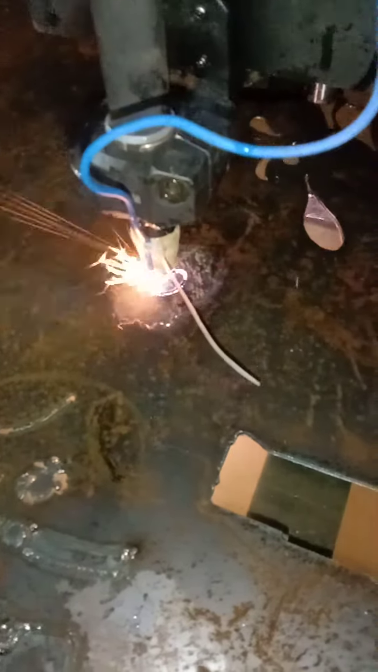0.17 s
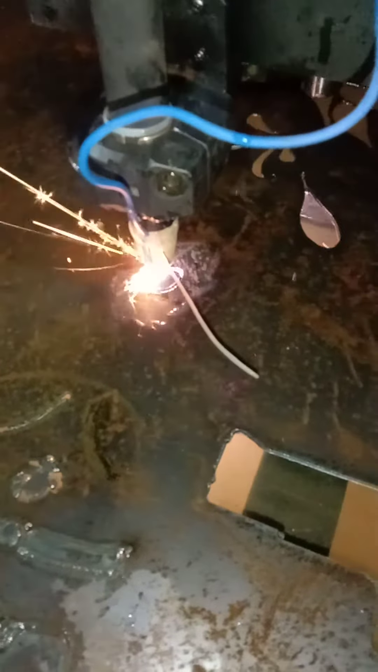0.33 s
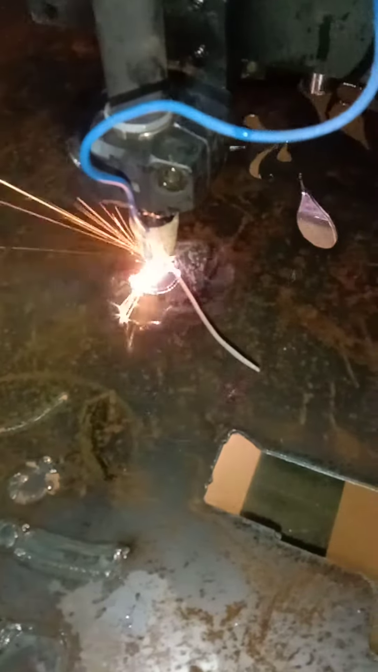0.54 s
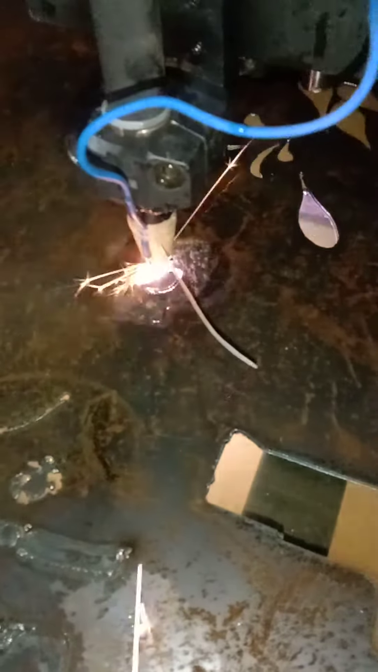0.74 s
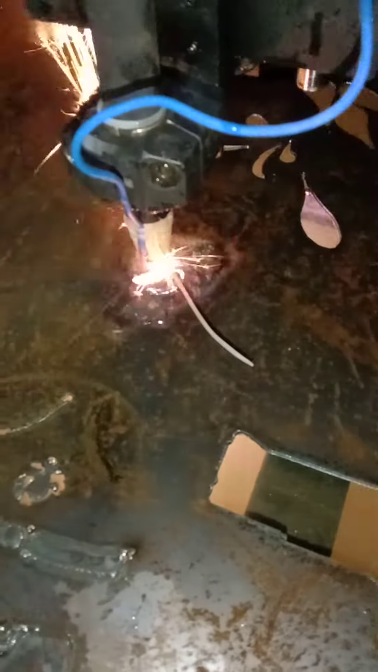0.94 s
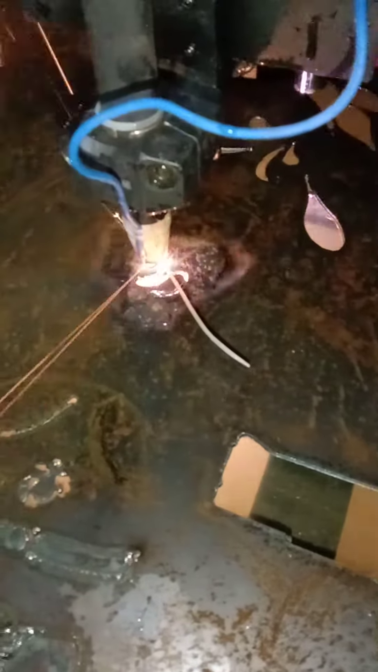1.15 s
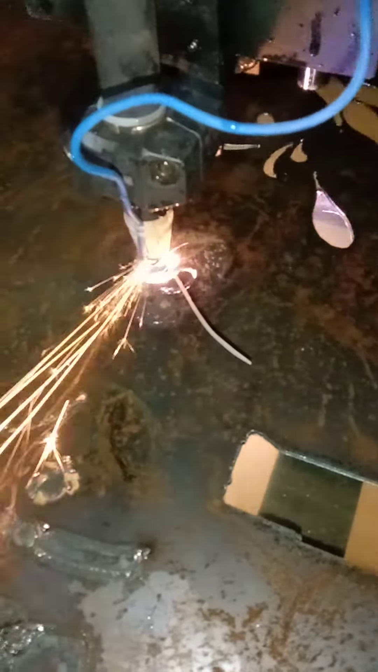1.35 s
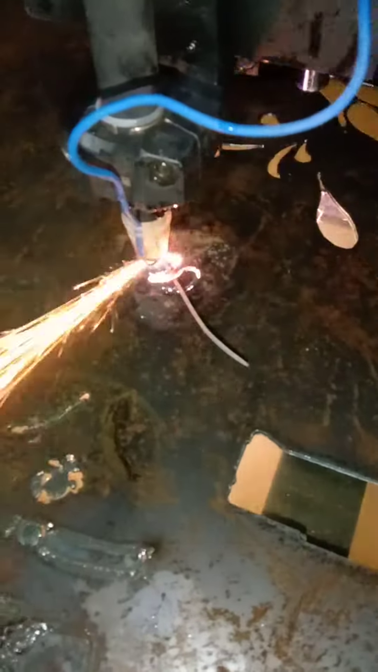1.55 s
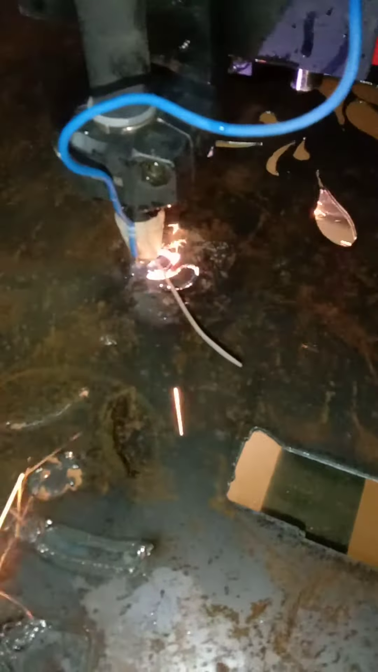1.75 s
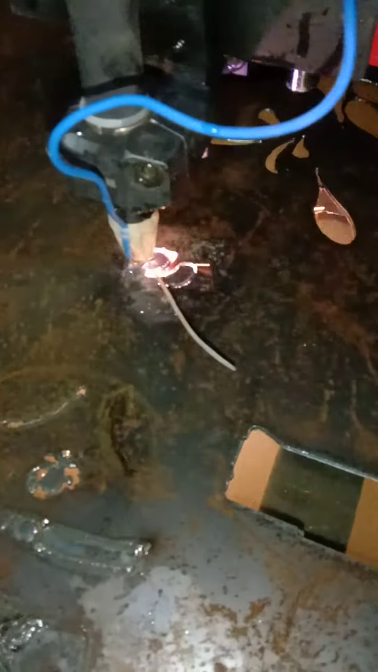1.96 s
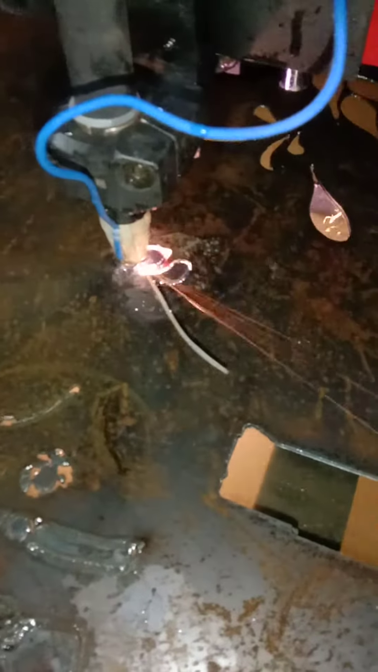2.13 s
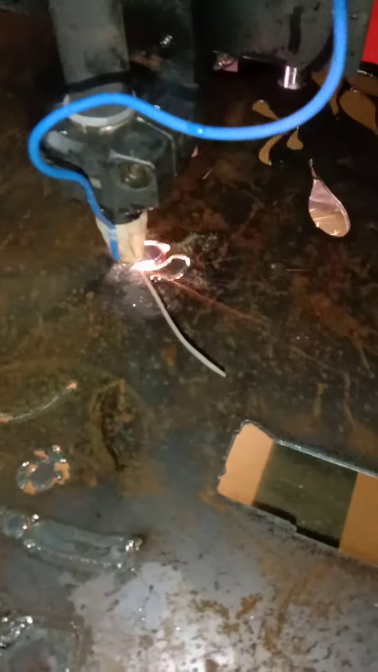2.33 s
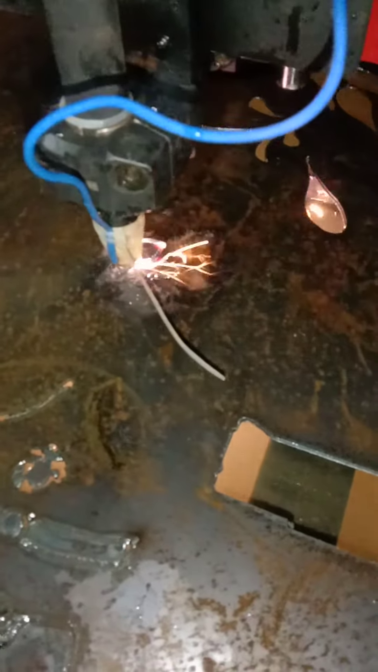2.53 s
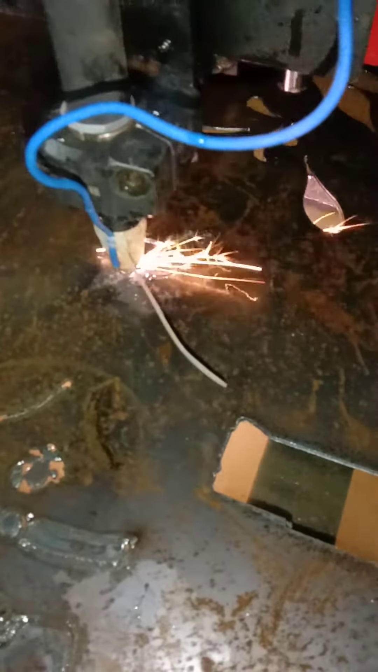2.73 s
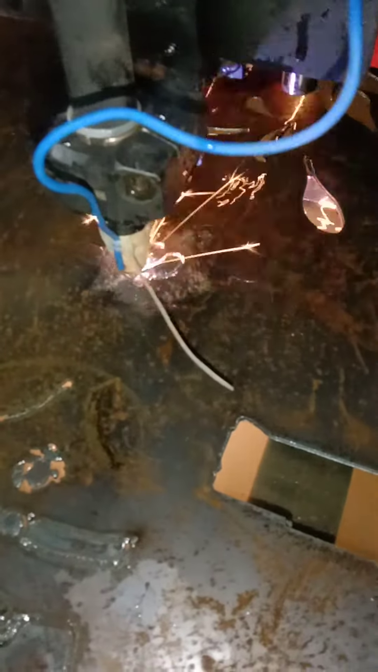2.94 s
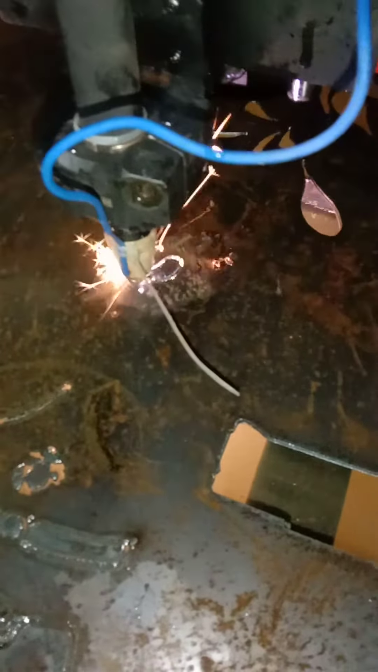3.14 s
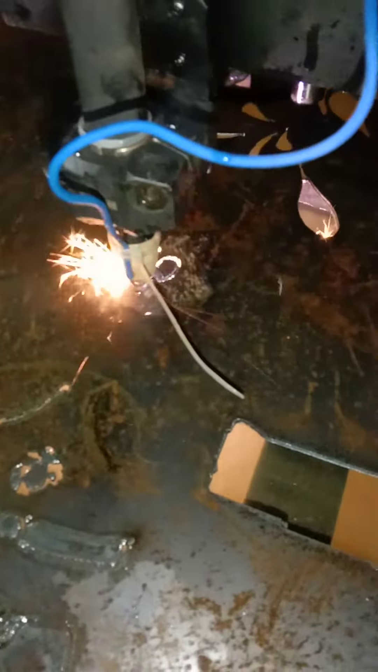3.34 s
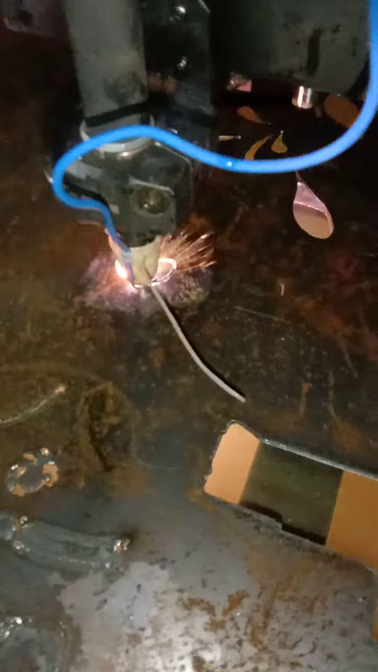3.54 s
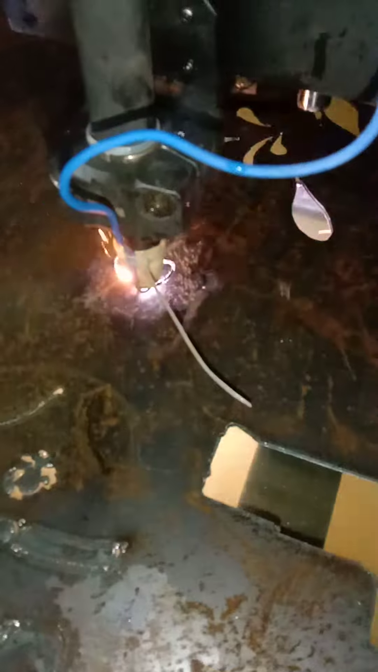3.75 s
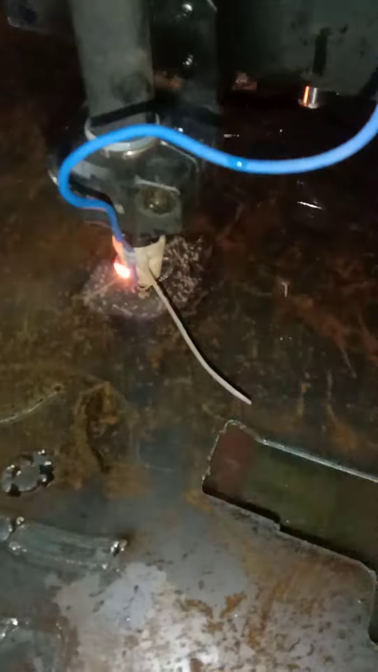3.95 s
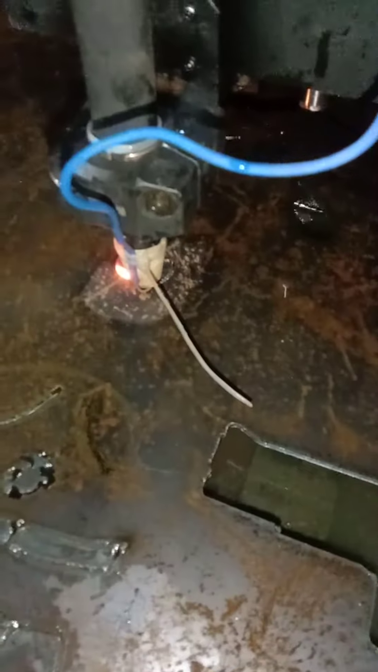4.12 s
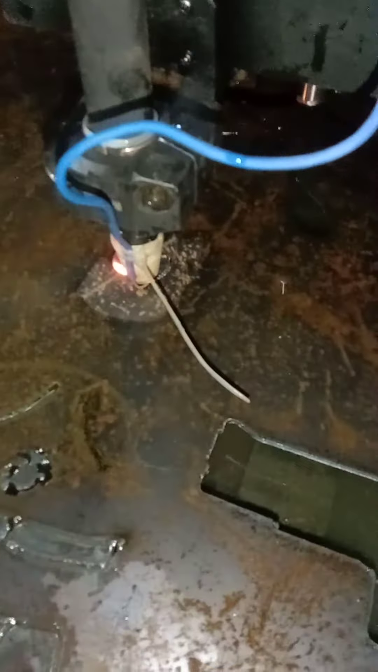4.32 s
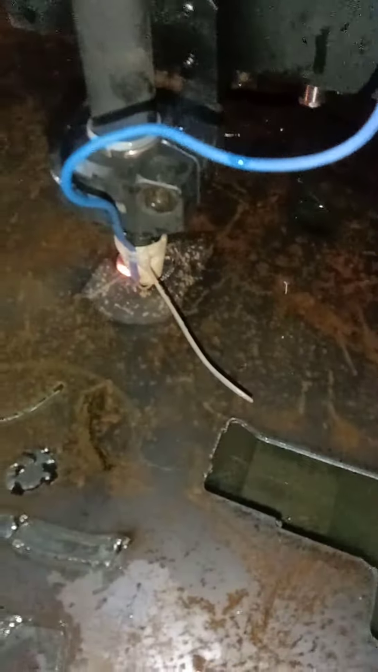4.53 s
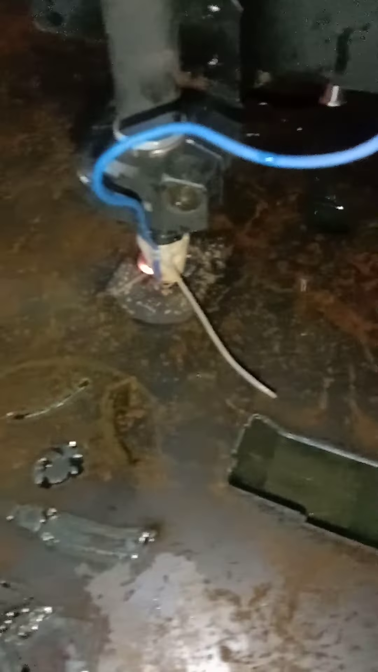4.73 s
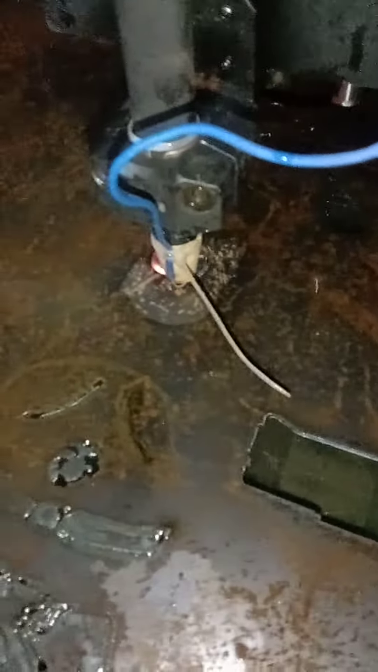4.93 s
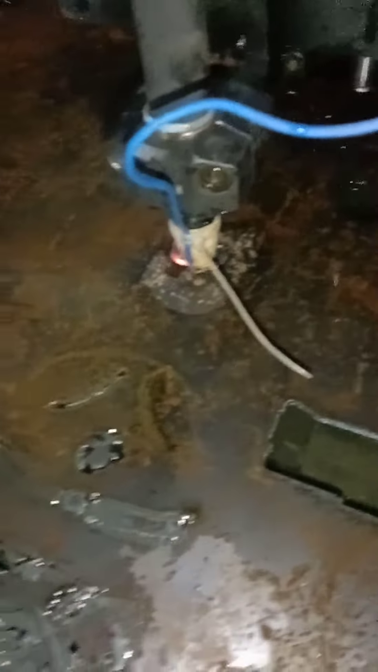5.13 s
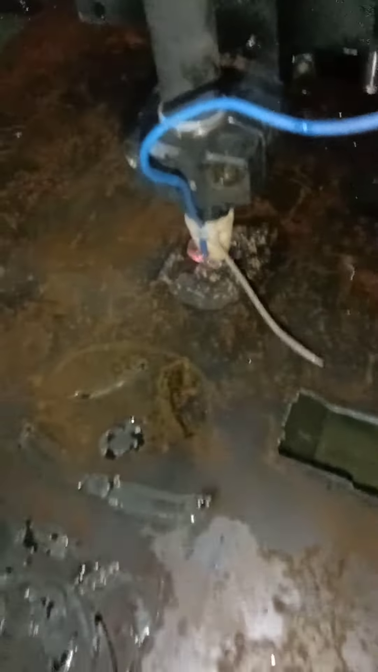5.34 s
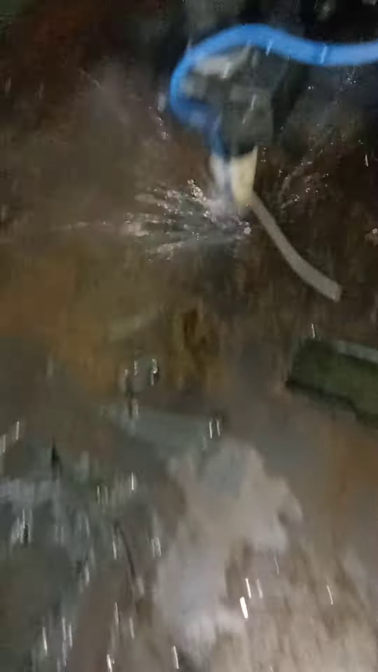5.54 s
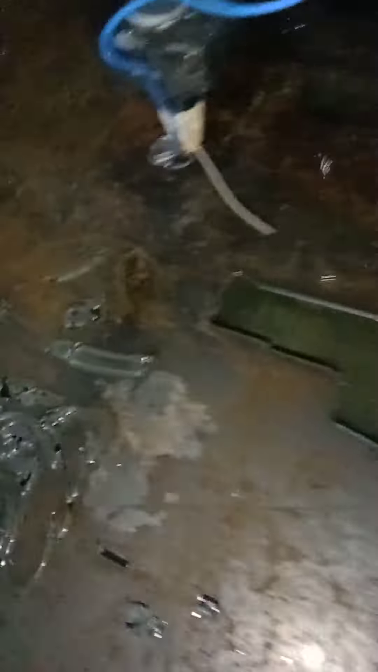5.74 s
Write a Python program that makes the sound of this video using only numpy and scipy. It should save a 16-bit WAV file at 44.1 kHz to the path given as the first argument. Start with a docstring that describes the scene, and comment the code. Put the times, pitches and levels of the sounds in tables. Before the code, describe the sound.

Harsh, fluttering arc hiss fills the first four seconds, with sharp crackles thickest at the start and whistles swelling in the slot. A short flare and a cluster of pops end it. Softer steady air follows under a thin drive whine, until the torch moves and its jet blasts the wet plate in uneven, splashy gusts. Close mono pickup, short shop reverberation.

```python
"""Plasma torch cutting wet steel

A plasma torch on a cutting table burns through a wet steel plate, close to the microphone.
The arc hisses as shaped noise, narrow-band noise whistles hoarsely in the kerf, and spatter pops as short pulses.
At 4 s the arc goes out and the cooling air flows on, soon joined by the drive's whine, a pair of sines.
At about 5 s the torch moves on: its air whooshes over the cut edge and blasts water off the plate."""
import sys
import numpy as np
from scipy import signal
from scipy.fft import rfft, irfft, next_fast_len
from scipy.io import wavfile
from scipy.ndimage import uniform_filter1d, map_coordinates

SR = 44100
rng = np.random.default_rng(int(sys.argv[2]) if len(sys.argv) > 2 else 0)


def generate_wav(signal):
    """Clip the signal to [-1, 1] and save it as 16-bit WAV at the path in sys.argv[1]."""
    frames = np.transpose(np.atleast_2d(signal))
    scaled = np.clip(frames, -1, 1) * 32767
    pcm = np.round(scaled).astype(np.int16)
    wavfile.write(sys.argv[1], SR, pcm)


N = 254898

# Loudest bursts of molten spatter. Each row: start in seconds, relative level in dB.
POPS = [(0.01, -12.5), (0.034, -13), (0.127, -18.5), (0.348, -22), (0.516, -22), (0.526, -22), (0.54, -22),
        (0.567, -23), (0.598, -14.5), (0.68, -21), (0.704, -27), (2.096, -26), (2.257, -24), (2.299, -23),
        (2.458, -26), (2.48, -25.5), (2.562, -22), (2.798, -19), (2.874, -23.5), (3.008, -22), (3.033, -26),
        (3.093, -27), (3.34, -27.5), (3.42, -29), (3.528, -25.5), (3.922, -13.5), (3.931, -24),
        (3.956, -19), (3.985, -17.5), (3.991, -14), (4.012, -22)]

ARC_OFF_S, ARC_RELEASE_S = 4.006, 0.093  # releases are times to fade by 60 dB
MOVE_S, RUN_UP_S = 4.96, 0.6  # torch moves on, time to reach speed


def arc(hiss_trim_db=-0.02, fizz_trim_db=5.5):
    """The plasma jet tears through the plate; it flares with a shriek as it runs out of metal, then goes out."""
    # Burning arc. Each row: time in seconds, hiss and fizz levels in dB before trim.
    levels = [(0.0, -24.5, -29.5), (0.18, -26, -25), (0.38, -24.5, -29.5), (0.42, -23, -26.5),
              (0.74, -25, -25.5), (0.75, -22, -28), (1.01, -30.5, -33.5), (1.11, -27, -26),
              (1.3, -30, -31.5), (1.39, -28, -29), (1.48, -27, -35), (1.82, -26, -29), (2.54, -28.5, -29),
              (3.37, -25, -27), (3.71, -26, -27.5), (3.82, -29.5, -29.5), (3.92, -25, -23),
              (3.99, -25.5, -26)]
    # Arc spectrum. Each row: frequency in Hz, relative density in dB per Hz.
    colour = [(380, -22), (490, -14.5), (580, -7), (700, -5.5), (790, -14.5), (1060, -10.5), (1330, -4),
              (1950, -10.5), (3300, 0), (4200, -5), (5100, 4.5), (7200, 2), (8900, -2), (11200, -2),
              (15400, 7)]
    # Ring of the plate under the arc. Each row: centre in Hz, width in Hz, gain in dB before depth.
    plate = [(1290, 40, 2), (1338, 55, 2.5), (1413, 97, -4), (1512, 22, 7.5), (1550, 60, -1.5),
             (1746, 45, 2), (2100, 40, 1)]
    flare_s, flare_attack_s, shriek_hz, shriek_half_width_hz, shriek_db = 3.872, 0.017, 7000, 750, -24.5
    roar_db, roar_release_s = -34.5, 0.65
    stir_db, stir_attack_s, stir_release_s = -27.5, 0.0057, 0.16

    noise = reflected(rush(colour, patchy_db=1.82, drift_db=1.94), strength=0.28, nozzle_depth=0.28)
    noise = ridged(noise, plate, depth=1.12)
    hiss_db, fizz_db = curves(levels)
    lit = burning(ARC_RELEASE_S)
    # each burst of spatter stirs up the roar
    stirred = sum(amp(db + stir_db) * envelope(s, stir_attack_s, s, stir_release_s) for s, db in POPS)
    roar = amp(roar_db) * burning(roar_release_s) + stirred * lit
    gains = (amp(hiss_db + hiss_trim_db) * lit, roar, amp(fizz_db + fizz_trim_db) * lit)
    flame = jet(noise, gains, flutter_db=0.8, flutter_knots_per_s=61.34)
    flare = envelope(flare_s, flare_attack_s, ARC_OFF_S, ARC_RELEASE_S)
    return flame + amp(shriek_db) * flare * whistle(shriek_hz, shriek_half_width_hz)


def kerf(whistle_half_width_hz=117, mode_half_width_hz=95, wander_db=3, wander_knots_per_s=3):
    """The slot whistles in swells as its shape changes; its higher modes come and go by chance."""
    # Hoarse whistles. Each row: start in seconds, length in seconds, frequency in Hz, mid-swell level in dB.
    whistles = [(0.0, 0.48, 2640, -38), (0.0, 0.93, 7040, -37), (0.72, 0.27, 3250, -33),
                (0.757, 0.31, 2660, -29), (0.892, 0.055, 2680, -21.5), (1.09, 0.68, 3160, -34),
                (1.428, 0.51, 2686, -34), (1.906, 0.14, 2630, -29.5), (1.915, 0.32, 3190, -36.5),
                (2.078, 0.24, 2696, -31.5), (2.302, 0.55, 2730, -35), (2.856, 0.43, 3324, -34.5),
                (3.13, 0.58, 7200, -35.5), (3.352, 0.15, 3510, -30.5), (3.78, 0.25, 9600, -35),
                (3.836, 0.1, 6420, -26)]
    # Higher modes of the kerf. Each row: frequency in Hz, level in dB before wander.
    kerf_modes = [(5070, -42.5), (7230, -44.5), (7920, -43), (9530, -53)]
    out = np.zeros(N)
    for s, length_s, hz, db in whistles:
        out += amp(db) * swell(s, length_s) * whistle(hz, whistle_half_width_hz, ragged_db=1.2)
    for hz, db in kerf_modes:
        level = amp(db + wander_db * wobble(wander_knots_per_s))
        out += level * whistle(hz, mode_half_width_hz) * burning(ARC_RELEASE_S)
    return out


def spatter(count=30, faint_db=-45, level_db=2):
    """Each burst is a sharp spike and a slower puff of either sign, with a short noise sizzle."""
    spike_s, spike_gain, puff_s, puff_gain = 0.00014, 1.2, 0.0008, 0.62
    sizzle_db, sizzle_t60_s = -15, 0.012
    afterpop_s, afterpop_db = 0.035, -8  # longest delay, level against its parent
    low_cut_hz = 78

    faint = [(when * ARC_OFF_S, faint_db + 10 * size) for when, size in rng.random((count, 2))]
    # bursts throw off weaker ones while the arc burns
    after = [(s + afterpop_s * rng.uniform(0.201, 1), db + afterpop_db)
             for s, db in POPS if s + afterpop_s < ARC_OFF_S]
    bursts = [*POPS, *after, *faint]
    draws = rng.standard_normal((len(bursts), 3))
    t = np.arange(SR // 16) / SR
    out = np.zeros(N + SR)
    for (s, db), (sharp, deep, side) in zip(bursts, draws):
        spike = spike_gain * bump(t / (spike_s * np.exp(0.24 * sharp)))
        puff = puff_gain * bump(t / (puff_s * np.exp(0.18 * deep)))
        sizzle = amp(sizzle_db - 60 * t / sizzle_t60_s) * rng.standard_normal(len(t))
        out[round(s * SR):][:len(t)] += amp(db) * (np.sign(side) * (spike + puff) + sizzle)
    return amp(level_db) * high_passed(out[:N], 3, low_cut_hz)


def spray(hiss_trim_db=0.6, fizz_trim_db=2.5):
    """The moving jet atomises the water on the plate and pushes the rest aside with a gurgle."""
    # Air blasting the wet plate. Each row: time in seconds, hiss and fizz levels in dB before trim.
    levels = [(5.1, -34, -35), (5.196, -25, -24.5), (5.45, -19, -22), (5.516, -23.5, -34),
              (5.554, -18.5, -31), (5.596, -22, -47), (5.616, -21, -30), (5.78, -22.5, -33)]
    # Spray spectrum. Each row: frequency in Hz, relative density in dB per Hz.
    colour = [(380, -28), (650, -10), (850, -16), (1350, -7), (1900, -15.5), (3300, -9.5), (4200, -12),
              (5600, 2), (7500, -3.5), (9500, -7.5), (11200, -6), (13200, -1), (15400, -1)]
    roar_db, roar_attack_s = -37, 0.36
    splash_s, splash_length_s, splash_db = 5.53, 0.036, 3.5  # jet hits a puddle: extra gain
    gurgle_s, gurgle_length_s, gurgle_hz, gurgle_db = 5.7, 0.1014, 576, -41

    noise = reflected(rush(colour, patchy_db=0.6, drift_db=1.0), strength=0.52, nozzle_depth=0.11)
    hiss_db, fizz_db = curves(levels)
    roar = amp(roar_db) * np.minimum(since(MOVE_S) / roar_attack_s, 1)
    gains = (amp(hiss_db + hiss_trim_db), roar, amp(fizz_db + fizz_trim_db))
    mist = jet(noise, gains, flutter_db=0.04, flutter_knots_per_s=120)
    mist = mist * during(levels) * amp(splash_db * swell(splash_s, splash_length_s))
    gurgle = whistle(gurgle_hz, half_width_hz=67, ragged_db=3)
    return mist + amp(gurgle_db) * swell(gurgle_s, gurgle_length_s) * gurgle


def edge():
    """The jet catches the edge of the cut; the whoosh falls in pitch as the gap opens."""
    start_s, from_hz, to_hz, glide_s = 5.072, 3000, 1780, 0.033
    level_db, attack_s, release_s = -29, 0.071, 1.0
    hz = to_hz + (from_hz - to_hz) * np.exp(-since(start_s) / glide_s)
    whoosh = high_passed(whistle(hz, half_width_hz=570, ragged_db=4.5), 4, 900)
    return amp(level_db) * envelope(start_s, attack_s, start_s + attack_s, release_s) * whoosh


def air(level_db=-26.5):
    """Compressed air leaves the nozzle steadily, with or without the arc."""
    # Air spectrum. Each row: frequency in Hz, relative density in dB per Hz.
    colour = [(240, -28), (380, -38), (500, -22), (600, -13.5), (700, -10.5), (800, -17), (1350, -10),
              (1950, -16.5), (2400, -11), (4200, -9.5), (5150, -1.5), (7100, -2), (8800, -10.5),
              (11200, -10), (15400, -2.5)]
    noise = rush(colour, patchy_db=1.5, drift_db=-0.66)
    return amp(level_db) * reflected(noise, strength=0.59, nozzle_depth=1.45)


def drive(hum_hz=243, hum_db=-51.5):
    """A slightly unsteady sine whine with its octave, and the gantry's hum once it travels."""
    # Drive whine. Each row: time in seconds, pitch in Hz, fundamental and octave rms levels in dB before waver.
    whine = [(4.08, 718, -48, -58), (4.136, 712, -45.5, -50), (4.43, 738, -50, -56),
             (4.444, 735.4, -50, -50), (4.6, 735, -57.5, -54), (5.04, 730, -49, -53),
             (5.144, 730, -40.5, -43), (5.608, 729.7, -43.5, -46.5), (5.78, 722, -46, -30)]
    hz, first_db, octave_db = curves(whine)
    phase = 2 * np.pi * np.cumsum(hz * (1 + 0.0024 * wobble(40))) / SR
    first = amp(first_db + 1.9 * wobble(24.8)) * np.sin(phase)
    octave = amp(octave_db + 1.8 * wobble(35)) * np.sin(2 * phase)
    hum = amp(hum_db) * effort() * whistle(hum_hz, half_width_hz=7.1)
    return np.sqrt(2) * (first + octave) * during(whine) + hum


def rumble(rest_db=-65.5, arc_db=-52, travel_db=-48.5, arc_release_s=0.46):
    """The table and the shop murmur, more so under the arc and while the gantry travels."""
    # Murmur spectrum. Each row: frequency in Hz, relative density in dB per Hz.
    colour = [(25, -28), (70, -12), (125, -10.5), (178, 4.5), (215, 3), (280, 2), (340, 0.5), (460, -11),
              (700, -19.5)]
    level = amp(rest_db) + amp(arc_db) * burning(arc_release_s) + amp(travel_db) * effort()
    return rush(colour, patchy_db=2.5, drift_db=1.5) * level


def workshop(x, low_cut_hz=150):
    """A diffuse tail from the shop's walls: decaying noise with little bass, its top treble dying first."""
    # Ring of the shop. Each row: frequency in Hz, time to fade by 60 dB in seconds.
    shop = [(150, 0.46), (700, 0.19), (2500, 0.25), (6000, 0.13), (15000, 0.081)]
    hz, t, z = signal.stft(rng.standard_normal(SR // 2), SR, nperseg=256)
    decay = amp(-60 * t / along(shop, hz)[:, None])
    tail = signal.istft(z * decay, SR, nperseg=256)[1]
    tail = high_passed(tail, 2, low_cut_hz)
    delayed = np.pad(tail, (SR // 200, 0))  # 5 ms
    return signal.fftconvolve(x, delayed / np.linalg.norm(tail))[:N]


def jet(noise, gains, flutter_db, flutter_knots_per_s):
    """Large eddies roar, the jet's core hisses and the smallest eddies fizz; gains are (hiss, roar, fizz)."""
    roar = filtered(noise, lambda hz: below(hz, 2390))
    fizz = filtered(noise, lambda hz: 1 - below(hz, 8940))
    parts = (noise - roar - fizz, roar, fizz)
    flow = sum(unit(part) * gain for part, gain in zip(parts, gains))
    return flow * amp(flutter_db * wobble(flutter_knots_per_s))


def whistle(hz, half_width_hz, ragged_db=1.6):
    """Turbulence drives a damped air resonance, now harder, now softer: noise on a carrier, rms 1."""
    slow = signal.butter(2, half_width_hz, fs=SR, output="sos")
    a, b = signal.sosfilt(slow, rng.standard_normal((2, N)))
    phase = 2 * np.pi * np.cumsum(hz * np.ones(N)) / SR
    tone = a * np.cos(phase) + b * np.sin(phase)
    return unit(tone * amp(ragged_db * wobble(35.14)))


def rush(colour, patchy_db, drift_db):
    """Turbulent noise of rms 1: eddies give it brief patches, the changing gap slowly drifting ridges."""
    z = signal.stft(rng.standard_normal(N), nperseg=512)[2]
    eddies = smoothed_field(z.shape, bins=6, frames=3)
    ridges = smoothed_field(z.shape, bins=2, frames=70)
    patchy = z * amp(patchy_db * eddies + drift_db * ridges)
    noise = signal.istft(patchy, nperseg=512)[1][:N]
    # steep bass fall below the first colour point
    skirt = lambda hz: np.minimum(hz / colour[0][0], 1) ** 4
    return unit(filtered(noise, lambda hz: amp(along(colour, hz)) * skirt(hz)))


def reflected(x, strength, nozzle_depth):
    """Nearby steel combs the sound within milliseconds; the nozzle gap adds its resonances."""
    # Echoes off plate and gantry. Each row: delay in milliseconds, gain before strength.
    echoes = [(0.498, -0.054), (1.0, -0.096), (1.322, 0.048), (1.9, -0.065), (2.61, -0.074), (3.74, -0.21)]
    # Nozzle and gap resonances. Each row: centre in Hz, width in Hz, gain in dB before depth.
    nozzle = [(1470, 130, 1), (2286, 84, 3.5), (5080, 140, 4), (5370, 180, 0), (6030, 74, 1),
              (8900, 440, -2.5), (9370, 110, 1.5), (10000, 160, 1.5), (10370, 100, 5.5), (12750, 120, 2),
              (13480, 200, 4.5), (14000, 150, 1), (14500, 150, -10), (15250, 300, 1)]
    bounced = sum(gain * np.roll(x, round(ms * SR / 1000)) for ms, gain in echoes)
    return unit(ridged(x + strength * bounced, nozzle, nozzle_depth))


def ridged(x, modes, depth):
    """Resonances lift or hollow narrow bands of a noise."""
    def response(hz):
        gain_db = sum(db / (1 + (2 * (hz - centre) / width) ** 2) for centre, width, db in modes)
        return amp(depth * gain_db)
    return filtered(x, response)


def burning(release_s):
    """1 while the arc burns, dying away once it is out."""
    return amp(-60 * since(ARC_OFF_S) / release_s)


def effort(steepness=3, ease_db_per_s=28):
    """The gantry's motors work harder until it is at speed, then ease off."""
    rise = np.minimum(since(MOVE_S) / RUN_UP_S, 1) ** steepness
    return rise * amp(-ease_db_per_s * since(MOVE_S + RUN_UP_S))


def since(start_s):
    """Seconds since a moment, 0 before it."""
    return np.maximum(np.arange(N) / SR - start_s, 0)


def envelope(start_s, attack_s, end_s, release_s):
    """Rise, hold until the end, then fall by 60 dB in the release time."""
    return np.minimum(since(start_s) / attack_s, 1) * amp(-60 * since(end_s) / release_s)


def swell(start_s, length_s):
    """A rounded rise and fall, 1 at its middle."""
    u = np.minimum(since(start_s) / length_s, 1)
    return 2 * np.sqrt(u * (1 - u))


def bump(u):
    """A one-sided pulse that peaks at 1 when u is 1."""
    return u * np.exp(1 - u)


def curves(rows):
    """One value per sample for each column after the time."""
    s, *cols = np.transpose(rows)
    return [np.interp(np.arange(N) / SR, s, c) for c in cols]


def during(rows, fade_s=0.023):
    """1 while a table lasts, with short fades outside it."""
    t = np.arange(N) / SR
    return np.clip(1 + np.minimum(t - rows[0][0], rows[-1][0] - t) / fade_s, 0, 1)


def wobble(knots_per_s):
    """A smooth random curve through normal random knots."""
    knots = np.arange(N) * knots_per_s / SR
    coarse = knots[::32]  # spline every 32 samples, straight lines between
    values = map_coordinates(rng.standard_normal(int(knots[-1]) + 4), [coarse])
    return np.interp(knots, coarse, values)


def smoothed_field(shape, bins, frames):
    """A random time-frequency field of rms 1, averaged over bins and frames."""
    across = uniform_filter1d(rng.standard_normal(shape), size=bins, axis=0)
    return unit(uniform_filter1d(across, size=frames, axis=1))


def filtered(x, response):
    """x filtered by a response given over frequency in Hz."""
    m = next_fast_len(N + SR // 2)
    return irfft(rfft(x, m) * response(np.fft.rfftfreq(m, 1 / SR)), m)[..., :N]


def high_passed(x, order, hz):
    """x without its bass."""
    return signal.sosfilt(signal.butter(order, hz, "high", fs=SR, output="sos"), x)


def below(hz, edge_hz):
    """A steep low-pass response, one half at its edge."""
    return 1 / (1 + (hz / edge_hz) ** 10)


def along(points, hz):
    """Interpolate (Hz, value) points on a log frequency axis."""
    f, v = np.transpose(points)
    return np.interp(np.log(hz + 1), np.log(f), v)


def amp(db):
    """Decibels to gain."""
    return 10 ** (np.asarray(db) / 20)


def unit(x):
    """Scale to rms 1."""
    return x / np.sqrt(np.mean(np.abs(x) ** 2) + 1e-20)


def scene():
    """One microphone hears the torch, the drive and the shop; both channels are alike."""
    direct = arc() + kerf() + spatter() + spray() + edge() + air()
    mono = direct + amp(-14) * workshop(direct) + drive() + rumble()
    return np.array([mono, mono])


def record(dry, top_hz=15550):
    """The recorder keeps nothing above its band limit."""
    return filtered(dry, lambda hz: hz < top_hz)


dry = scene()
out = record(dry)
generate_wav(out)
```